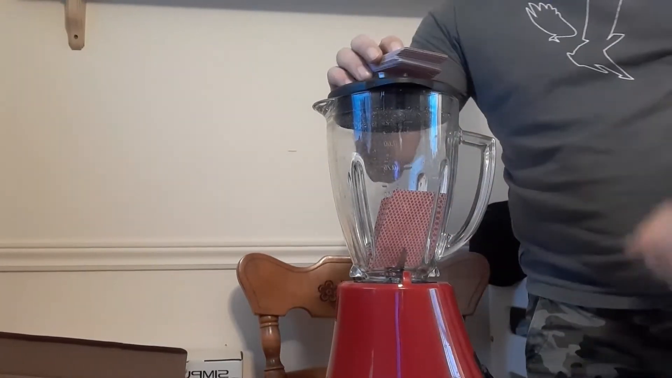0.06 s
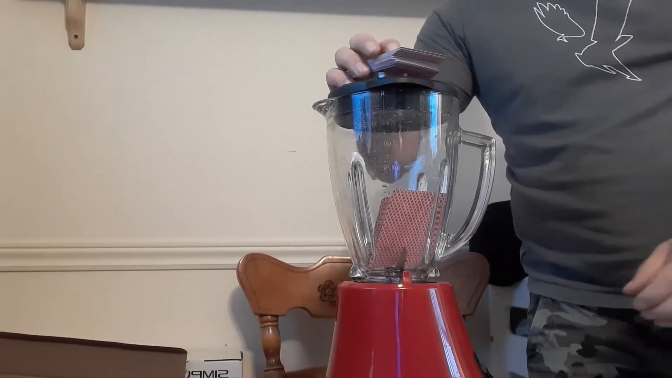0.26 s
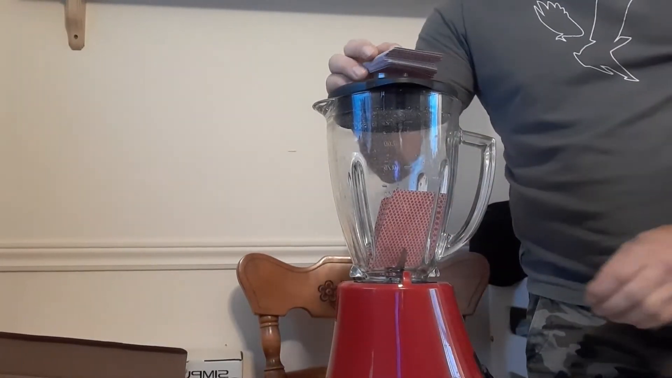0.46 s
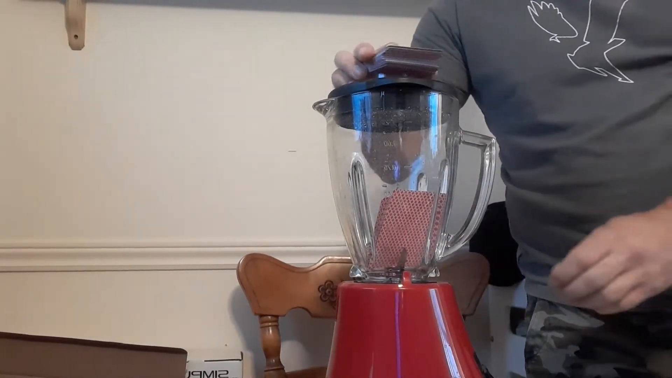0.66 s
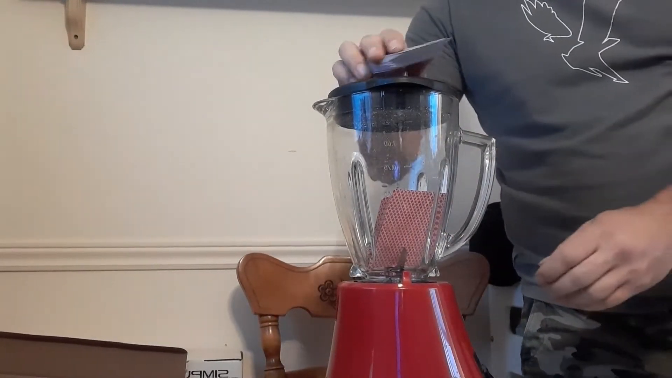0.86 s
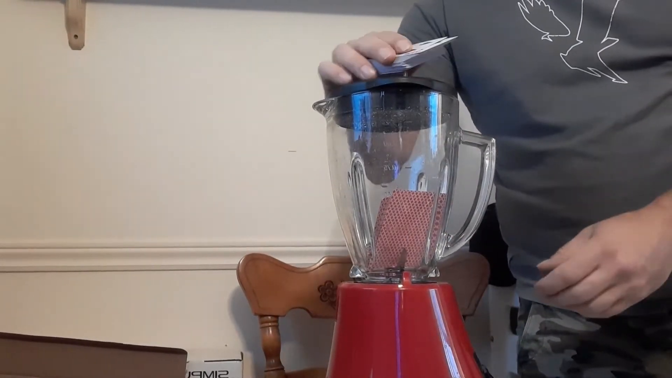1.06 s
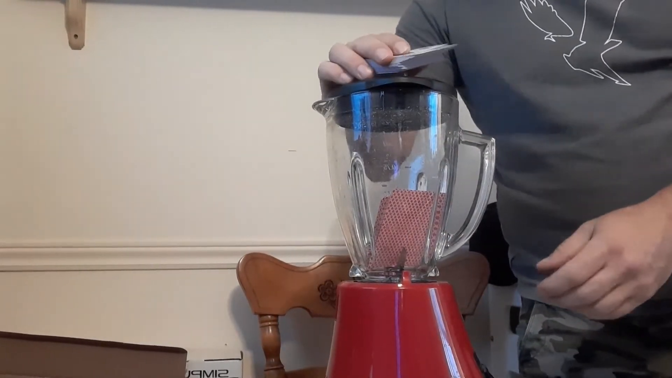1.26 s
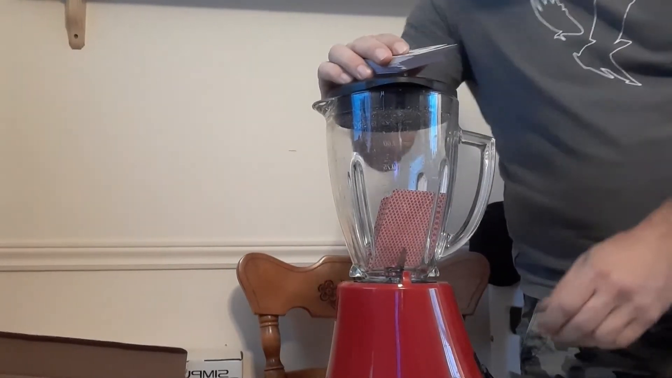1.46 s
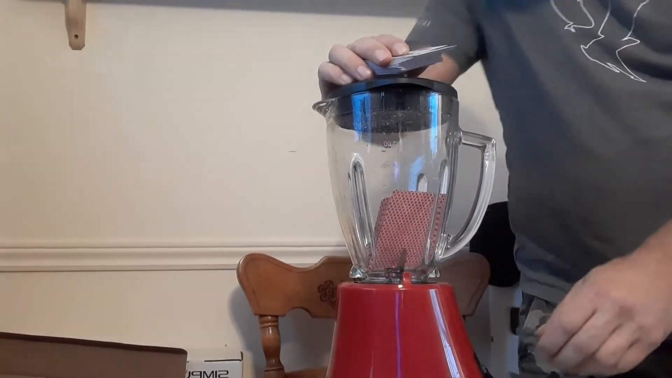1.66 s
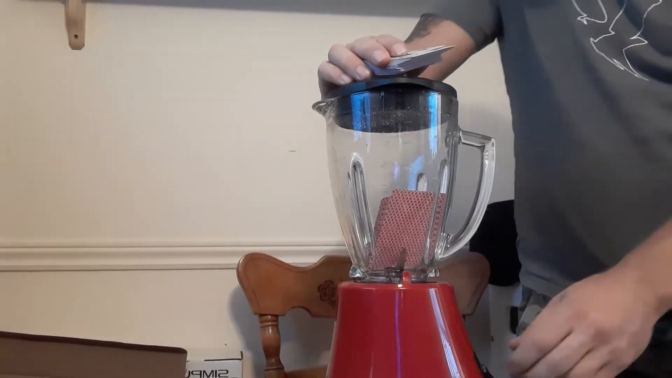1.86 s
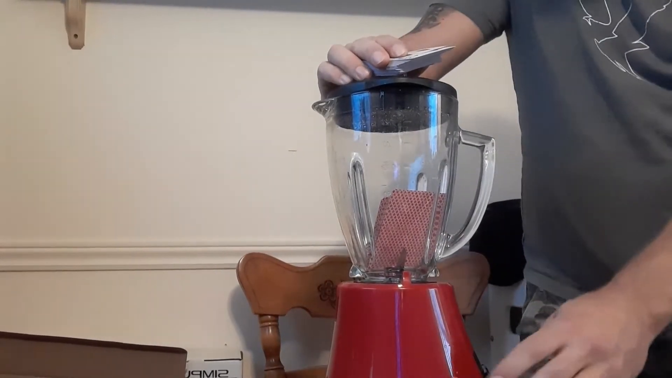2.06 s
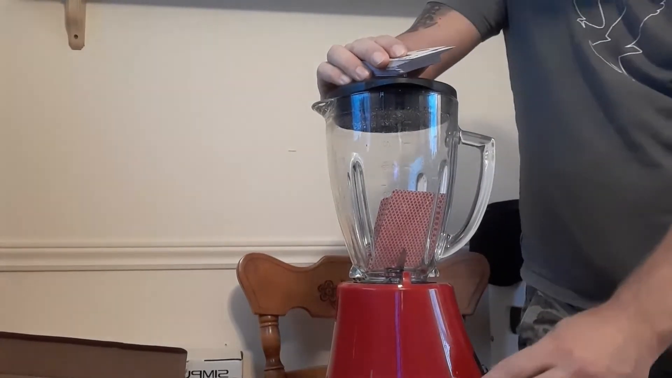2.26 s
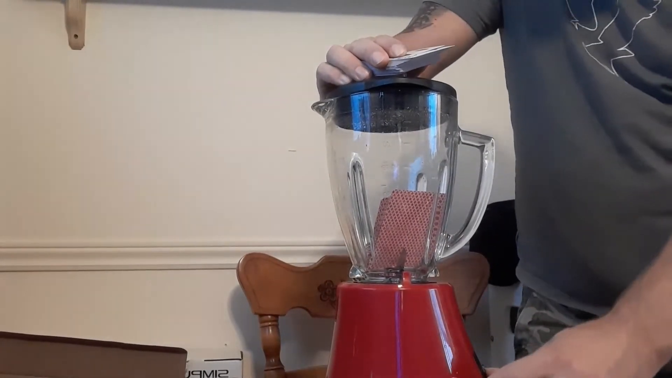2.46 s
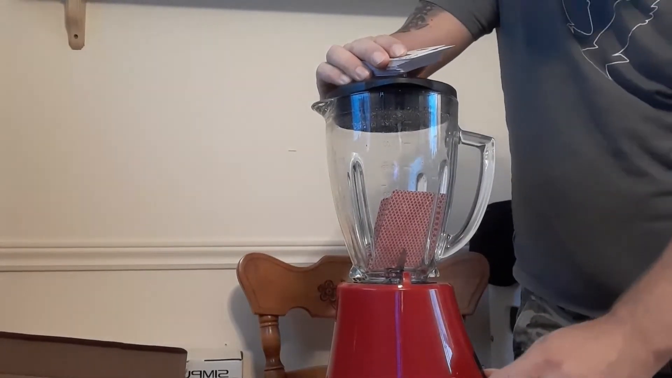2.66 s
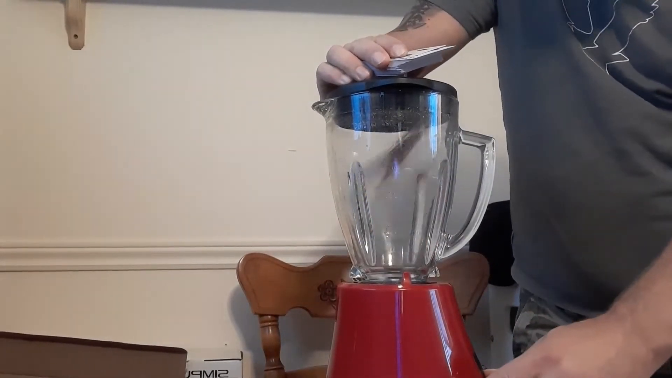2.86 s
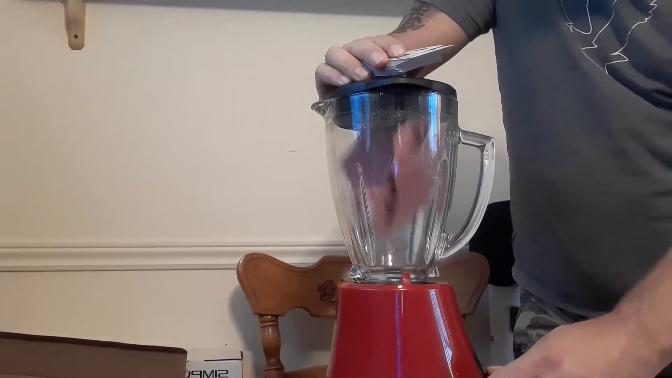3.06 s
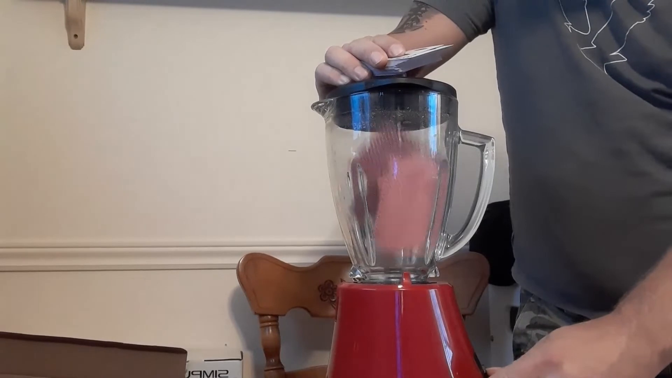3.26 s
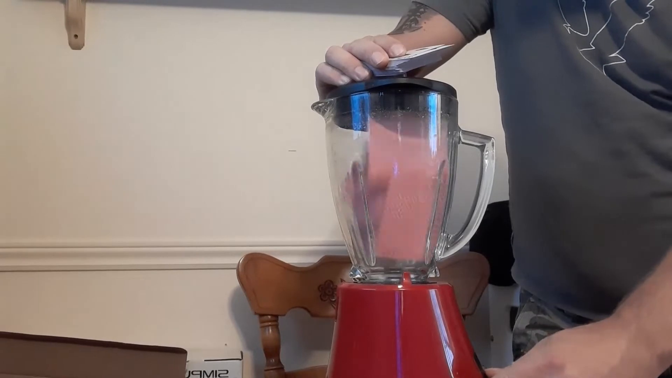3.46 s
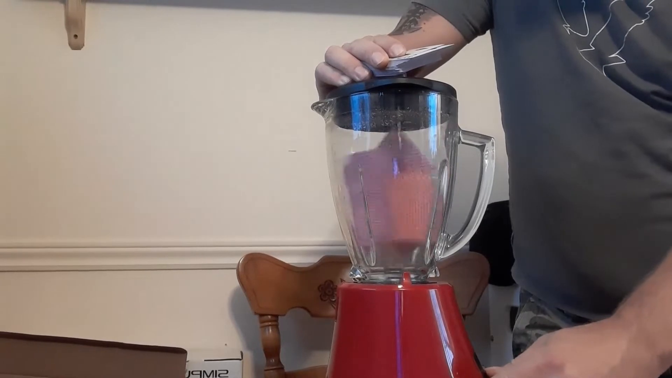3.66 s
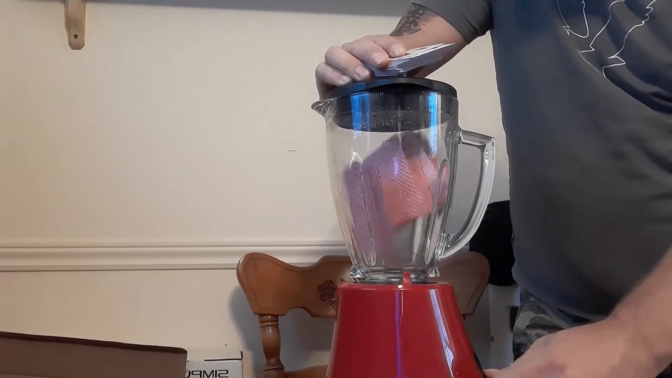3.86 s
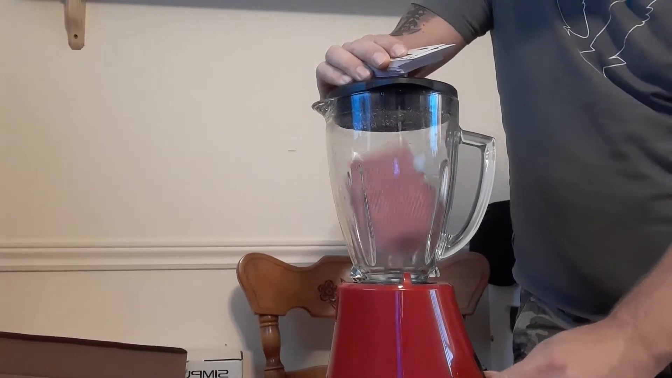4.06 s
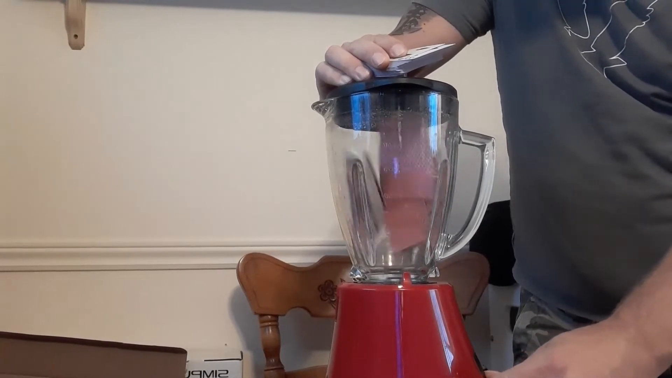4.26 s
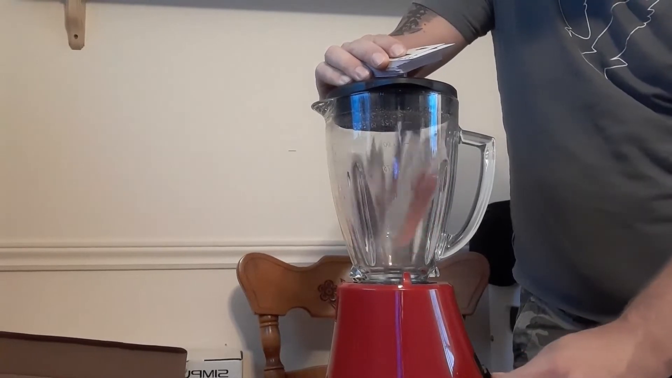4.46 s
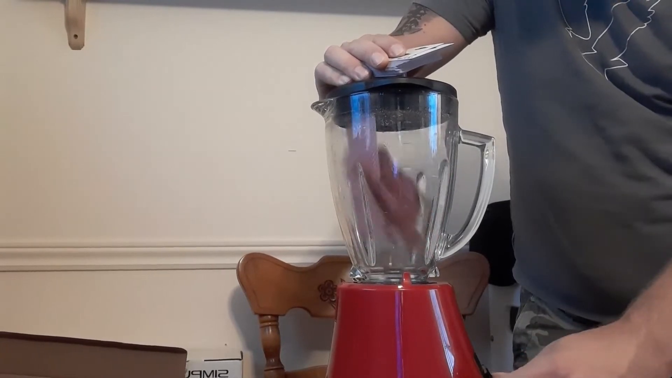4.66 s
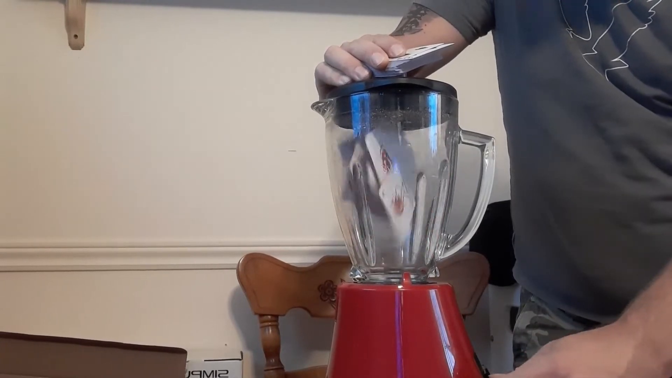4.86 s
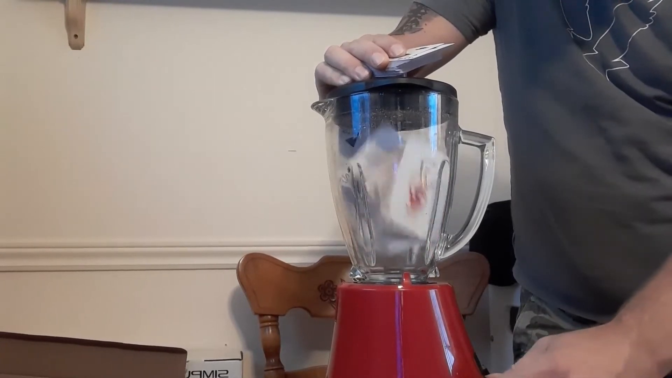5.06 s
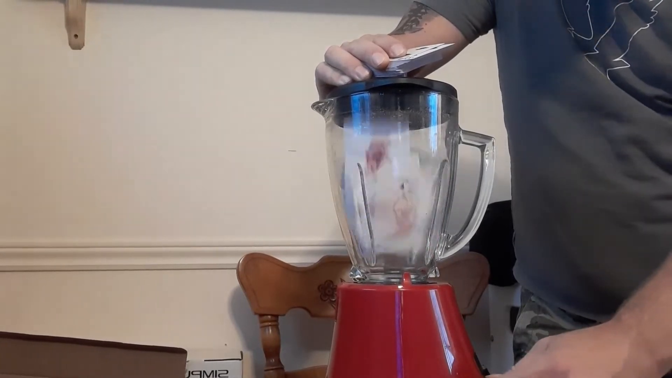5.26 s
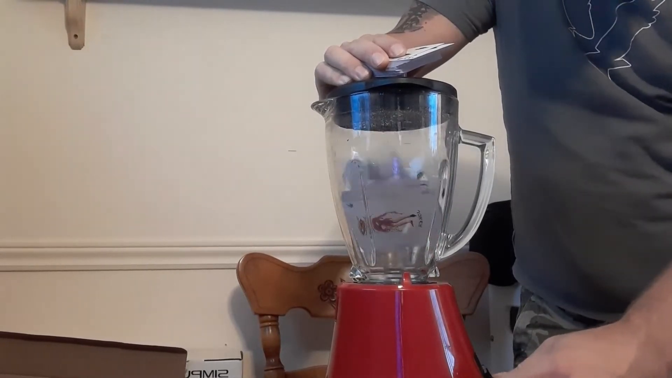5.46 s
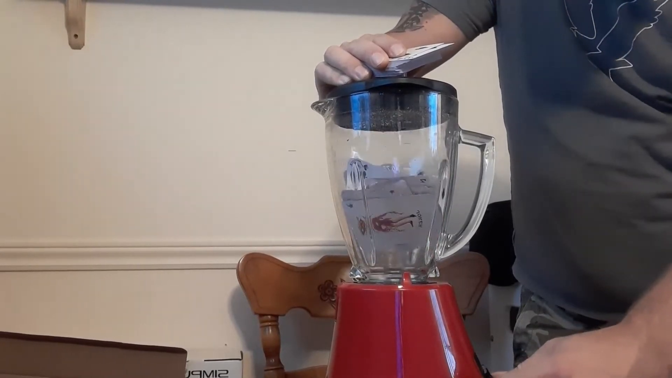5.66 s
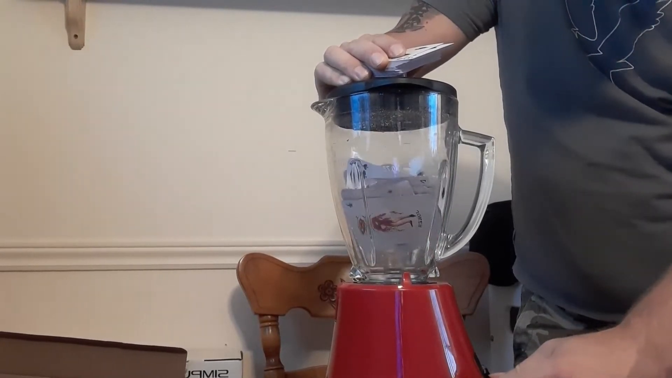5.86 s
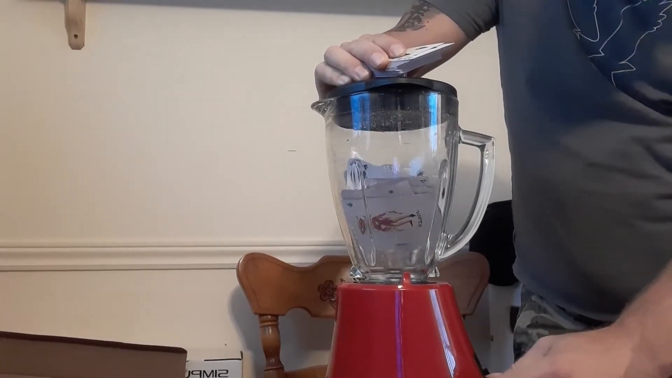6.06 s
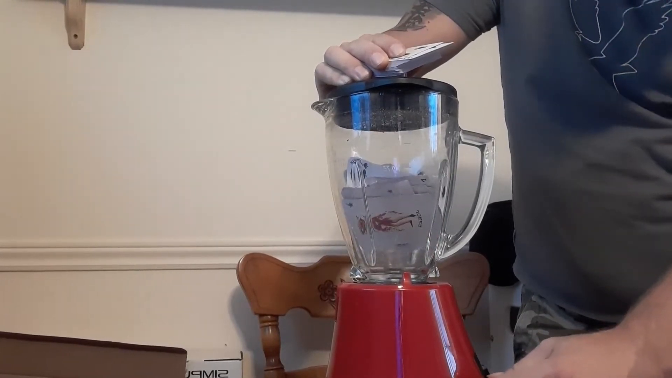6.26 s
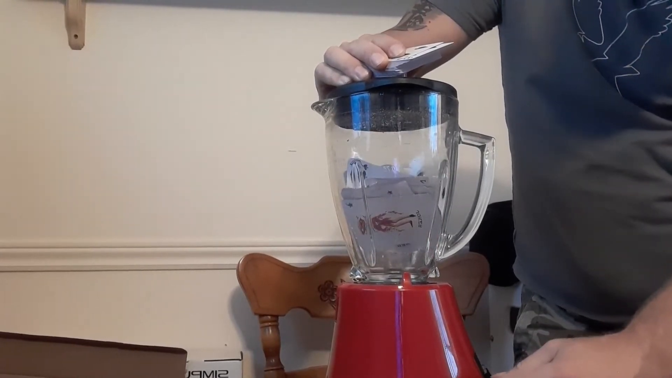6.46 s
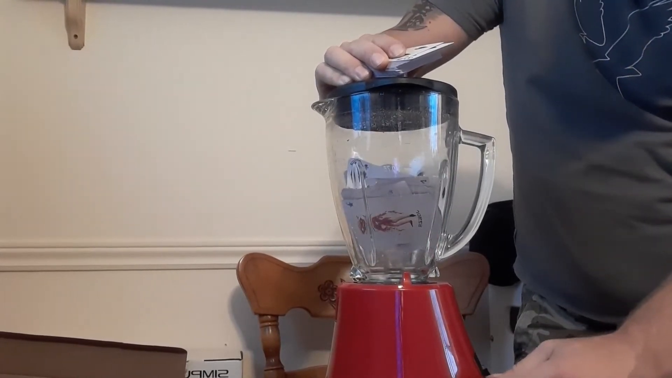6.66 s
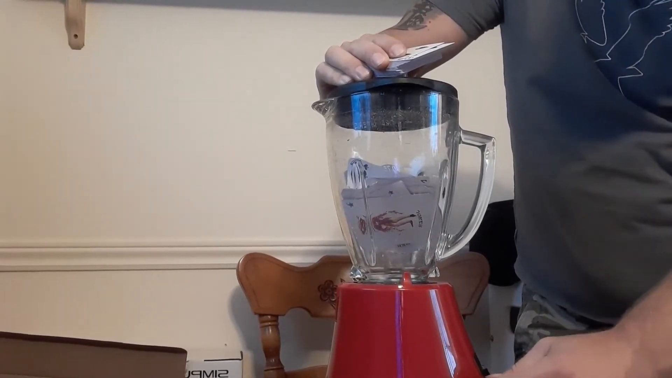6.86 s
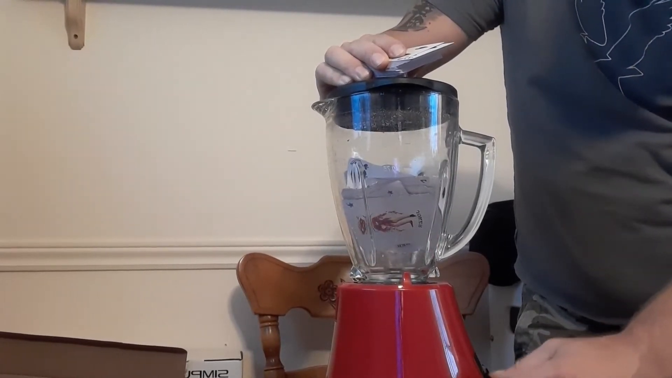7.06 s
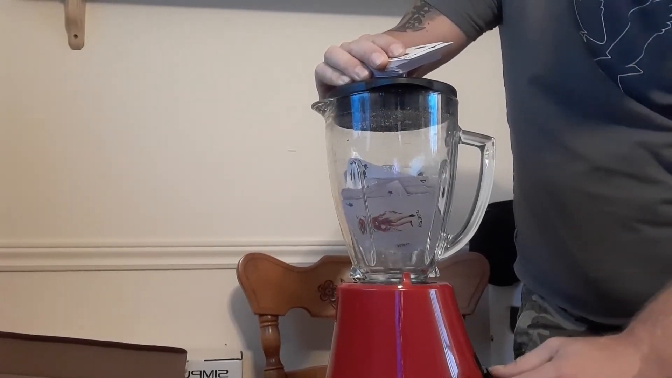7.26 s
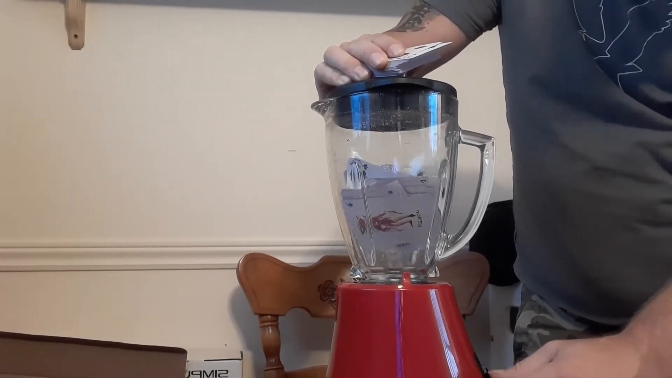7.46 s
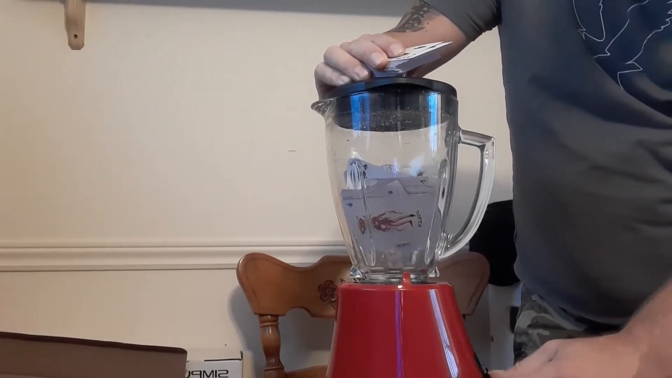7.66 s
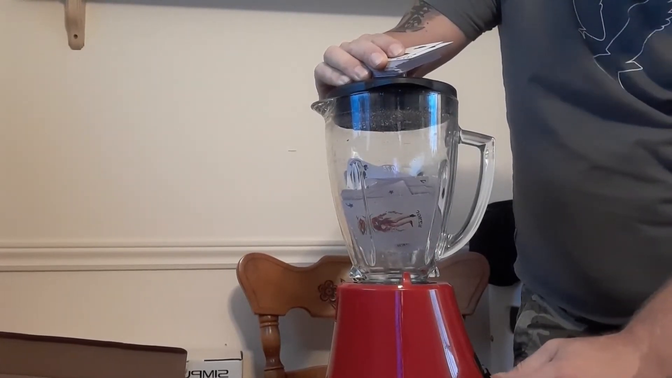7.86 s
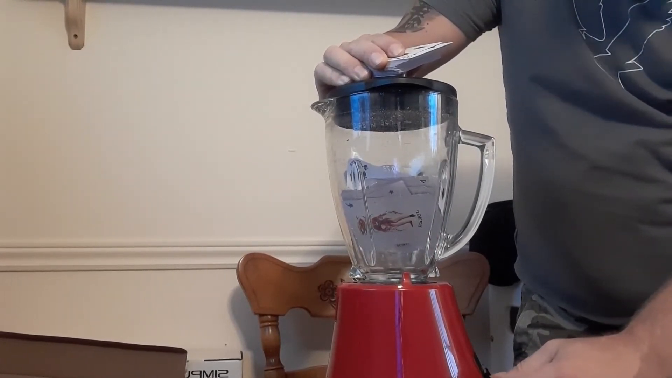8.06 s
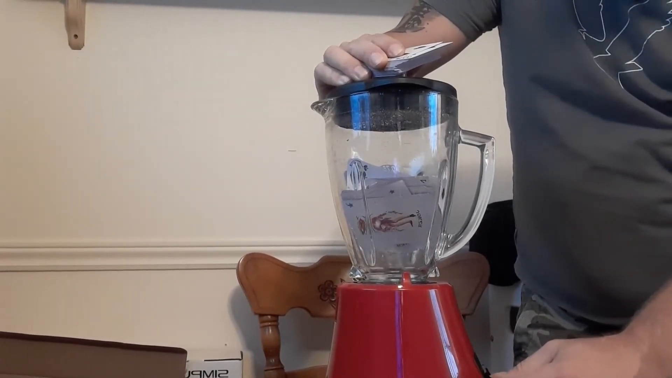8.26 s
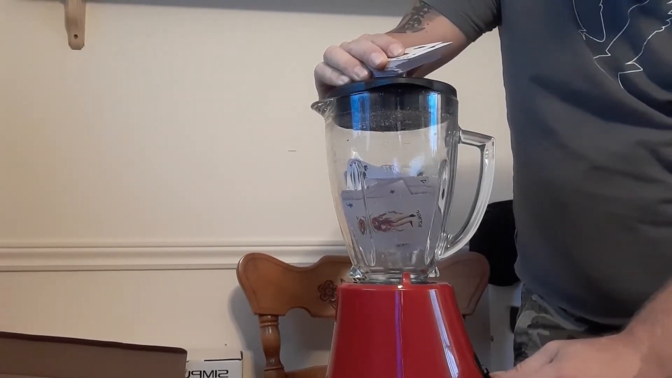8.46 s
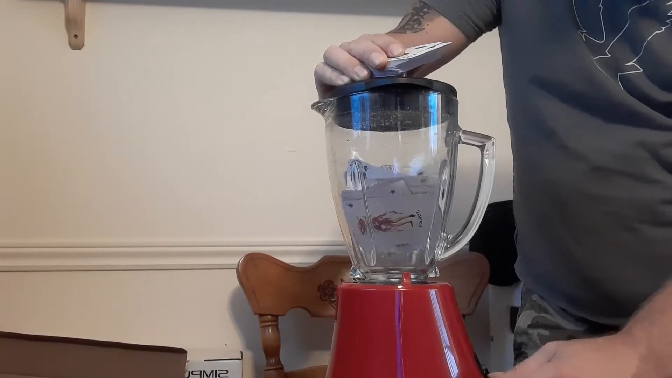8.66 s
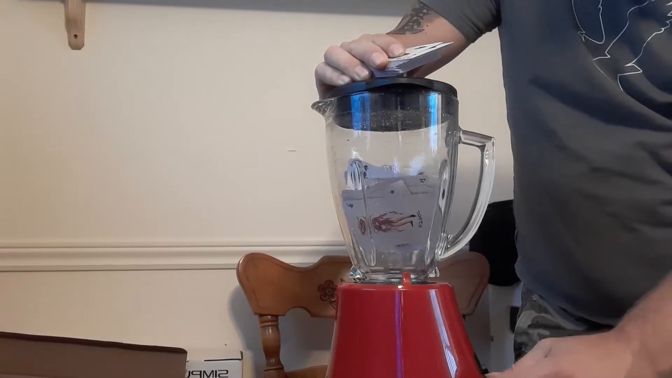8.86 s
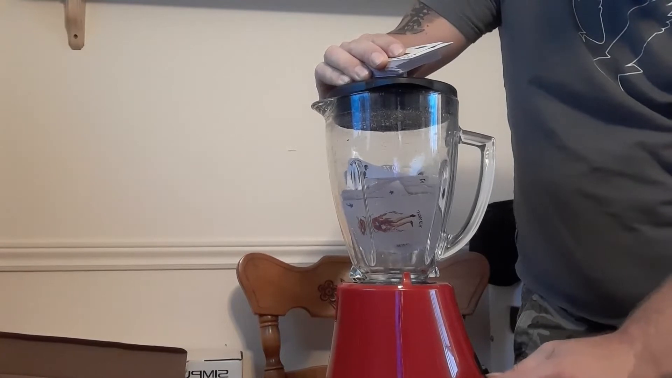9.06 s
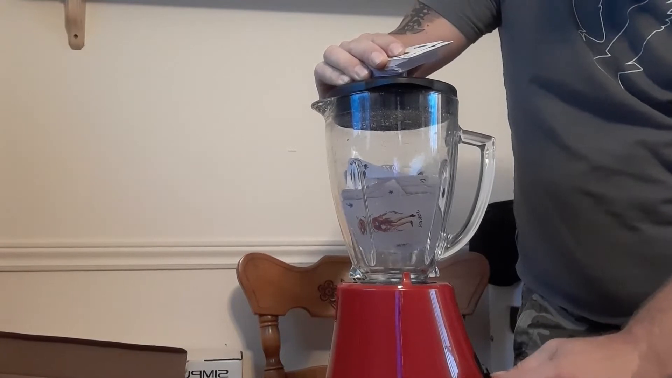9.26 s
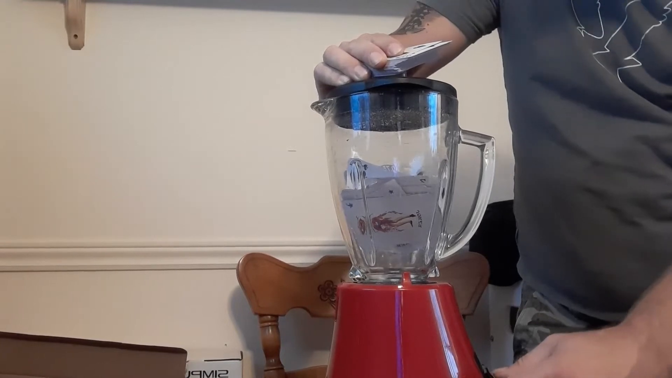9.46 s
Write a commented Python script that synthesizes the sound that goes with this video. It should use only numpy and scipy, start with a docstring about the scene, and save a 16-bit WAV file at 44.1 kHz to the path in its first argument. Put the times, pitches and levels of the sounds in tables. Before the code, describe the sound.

In a small room with a faint house hush, fingers tap and rub a plastic lid and cards tick lightly. Then a countertop blender is pulsed six times: the motor surges, drones and winds down, blades chop cards with hard cracks and glassy smacks. Later pulses are steadier, a buzzing drone with rushing flutter. Close microphone, stereo, short room echoes.

```python
"""A countertop blender with playing cards in its glass jar, in a small room with a faint house background.
First a hand settles on the lid: taps, rubs and ticks are short noise bursts, and the floor rumbles once.
Then six pulses spin the motor up against friction and air and let it coast: shaft orders drone through
the housing, four blades flick the cards in modulated noise, and caught cards are chopped and brake the rotor.
In the early pulses the loose cards also smack and boom; from about 5.3 s they lie wedged and the drone steadies."""
import sys
import numpy as np
from scipy import signal
from scipy.fft import rfft, irfft
from scipy.io import wavfile
from scipy.ndimage import uniform_filter1d

SR = 44100
rng = np.random.default_rng(int(sys.argv[2]) if len(sys.argv) > 2 else 0)


def transcribe(signal):
    """Save signal, clipped to [-1, 1], as a 16-bit WAV file at the path in sys.argv[1]."""
    frames = np.atleast_2d(signal).T
    limited = np.clip(frames, -1, 1)
    pcm = np.round(limited * 32767).astype(np.int16)
    wavfile.write(sys.argv[1], SR, pcm)


N = 418950
TIME = np.arange(N) / SR

# All levels are relative, ahead of the gains and filters in the functions.
# Background noise of the house: f/Hz, density/dB
FLOOR_SPECTRUM = [(25, -24), (80, 1.5), (120, 3.5), (175, -1.5), (300, 2), (600, -23.5), (2000, -18.5),
                  (3400, -27), (6800, -20), (10000, -29.5), (16000, -23)]
FLOOR_DB = -64.5

# Reverberation time of the room: f/Hz, t60/s
REVERBERATION = [(100, 0.79), (2000, 0.29), (15000, 0.31)]
# Echo level over direct sound: f/Hz, level/dB
ECHO_LEVEL = [(100, -5.5), (330, -8), (900, -1), (3000, 1), (8000, 3.5)]
# Left-right correlation of the echoes: f/Hz, correlation/1
ECHO_LIKENESS = [(100, 0.87), (300, 0.79), (600, 0.63), (1200, 0.01)]
# Left minus right: f/Hz, level/dB
STEREO_TILT = [(100, 3), (650, 1.6), (1290, 4), (8100, 0), (13000, 5.5)]

# The floor rumbles as the body shifts its weight: f/Hz, density/dB
BOARDS_SPECTRUM = [(30, -22), (75, 5), (125, 9), (220, -20), (3000, -70)]
SHIFT_S, SHIFT_HALF_S, SHIFT_DB = 2.02, 0.37, -57  # middle, half length, level

# Fingers and knuckles on lid and base: t/s, thud level/dB, click level/dB, decay/s
TAPS = [(0.204, -50, -54, 0.015), (0.217, -49.5, -56, 0.013), (1.668, -50, -46, 0.013),
        (1.762, -42, -41.5, 0.012), (1.782, -41, -57, 0.0096), (1.933, -50, -77, 0.028),
        (2.076, -48.5, -51, 0.017), (2.417, -47.5, -58, 0.025)]
# Spare cards in the hand tick on the plastic lid: t/s, level/dB, decay/s
LID_TICKS = [(.305, -56, 0.014), (.34, -44, .0035), (.35, -46, 0.0022), (.3805, -38, 0.0023),
             (.783, -55, .005), (1.917, -52, .005)]
# Hand and sleeve slide: middle t/s, half length/s, rumble level/dB, swish level/dB
RUBS = [(0.607, 0.075, -59.5, -82), (0.828, 0.098, -55.5, -71.5), (1.028, 0.05, -52.5, -70),
        (1.478, 0.076, -71, -67.5), (1.862, 0.19, -82, -68.5), (2.083, 0.033, -53, -56),
        (2.53, 0.02, -55, -68)]
# Spectrum of thuds, and of the rumble under the drone: f/Hz, density/dB
THUD_SPECTRUM = [(40, -24), (100, -17), (190, -8), (300, 0), (440, -7), (520, -15), (1500, -33),
                 (5000, -60)]
# Spectrum of the clicks of taps: f/Hz, density/dB
CLICK_SPECTRUM = [(200, -14), (700, 3), (1500, 3), (2700, -9), (3600, -15), (16000, -43)]
# Spectrum of cards on the lid: f/Hz, density/dB
LID_SPECTRUM = [(300, -19), (1300, -11), (2000, 2), (2600, -10), (3100, -17), (3650, -10), (4300, -22),
                (16000, -39)]
# Spectrum of the sliding sleeve: f/Hz, density/dB
SWISH_SPECTRUM = [(350, -27), (1470, -11), (2500, -6), (16000, -19.5)]
# Resonance of the appliance under the pressing hand: f/Hz, width/Hz, lift/dB
HAND_MODES = [(336.5, 19, 8.5)]

# The pulse button is held: on t/s, off t/s, starting pull/(Hz/s), cards level/dB, base level/dB
PULSES = [(2.72, 2.933, 874, 2, 1.5), (3.864, 4.287, 861, -.5, -2), (4.97, 5.399, 642, -1, -1.5),
          (6.032, 6.279, 754, -1.25, -2), (6.672, 7.046, 695, -0.5, -1), (8.717, 9.096, 850, 1, .5)]
# The blades catch a card: t/s, level/dB, decay/s, extra treble/dB
CATCHES = [(2.7684, -20.5, 0.016, -6), (2.869, -16, 0.0084, 1.5), (2.968, -15, 0.013, -6.5),
           (3.135, -18.5, 0.01, -2), (3.294, -20, 0.014, -3), (3.386, -25, 0.03, -2.5),
           (3.493, -27, 0.028, 1.5), (3.593, -26, 0.018, 1), (3.92, -26.5, 0.056, -5),
           (4.088, -20.5, 0.021, 0.5), (4.206, -23.5, 0.031, -0.5), (4.31, -21.5, 0.025, -3),
           (4.382, -22, 0.023, 0.5), (4.555, -17.5, 0.015, -5.5), (4.697, -27, 0.044, 0),
           (4.747, -17.5, 0.018, -6.5), (4.974, -22, 0.014, -2.5), (5.232, -19, 0.0091, -2.5),
           (5.284, -24, 0.014, 3), (5.817, -22, 0.0096, 1.5), (5.885, -24.5, 0.011, 7)]
CRUISE_HZ = 150  # reference shaft speed
PULL_FADE_HZ = 282  # speed over which the pull falls by a factor e
FRICTION_HZ_PER_S, AIR_HZ_PER_S = 88.6, 58.7  # braking; that of the air holds at cruising speed
BITE_HZ_PER_S = 1460  # braking by a caught card at 0 dB

# Level of the base while coasting, and its lift under power
BASE_DB, BASE_POWERED_DB = -31.5, 1.5
BASE_STANDSTILL = 0.88  # share of the shaking that a powered motor has before it turns
# Level of the cards at cruising speed, gain per doubling of speed, and lift under power
CARDS_DB, CARDS_DB_PER_OCTAVE, CARDS_POWERED_DB = -20, 5.5, 2.26
CARDS_STALL_HZ, BASE_STALL_HZ = 14.2, 25.6  # below these speeds cards and base fall quiet
# Cards press onto the blades (+) or are tossed clear (-): middle t/s, half length/s, level/dB
PACK_SHIFTS = [(3.723, 0.083, 6), (4.649, 0.042, -2), (4.876, 0.028, -4.5), (5.046, 0.06, -4),
               (7.09, 0.067, 2)]

# Shaft orders: multiple of speed/1, fast level/dB, slow level/dB, crawling level/dB, change under power/dB
ORDERS = [(1, -1, -5.5, -15, 0), (2, -1, -12, -12, 2), (3, -2.5, -16, -15, -4), (4, -9, 3, -4, -4),
          (5, 8.5, -8, -9, -9), (6, 8.5, -19, -7, -12), (8, -14, -14, 1, -4)]
WEDGED_S = 5.32  # by now the cards have stopped flying about
LOOSE_DB_PER_ORDER = -0.67  # while they fly, the high orders are weaker
WHINE_FADE_DB_PER_HZ = 0.1  # orders above 4 fade beyond cruising speed
# Spectrum of the base: f/Hz, density/dB
HOUSING_SPECTRUM = [(25, -63), (55, -17), (80, -14), (110, 3), (145, -5), (200, -5.5), (260, 1), (320, 3.5),
                    (400, -1.5), (560, -14), (950, -18.5), (2500, -14.5)]
# Resonances of the base on its table: f/Hz, width/Hz, lift/dB
BASE_MODES = [(126, 18, 5), (249, 14, 6), (365, 20, 3), (440, 24, 4), (710, 170, 6)]

# The switch closes and the coupling jerks: t/s, level/dB, decay/s
JERKS = [(2.72, -24, 0.5), (3.864, -8, 0.0035), (8.72, -22, 0.016)]
# The tumbling pack jolts the rotor and the base booms: t/s, level/dB, decay/s
BOOMS = [(2.745, -22, 0.085), (3.405, -17, 0.051), (3.52, -24, 0.05), (3.635, -23.5, 0.1)]
# Spectrum of the booms: f/Hz, density/dB
BOOM_SPECTRUM = [(60, -24), (190, -15), (250, 9.5), (285, 4), (370, -13), (900, -43), (5000, -66)]

# Resonances of the jar and the air in it: f/Hz, width/Hz, lift/dB
JAR_MODES = [(895, 140, 5), (1094, 92, 6.5), (1263, 184, 7.5), (1953, 53, 5.5), (2023, 23, 2.5),
             (2420, 38, 4.5), (2611, 118, 8), (3094, 87, 4.5), (3560, 34, 3), (4640, 130, 2.5)]
# Spectrum of the jar at speed: f/Hz, density/dB
RUSH_SPECTRUM = [(30, -58), (75, -6), (240, -18), (400, 1), (740, -14), (1230, -5.5), (1530, -10),
                 (1900, -1.5), (2180, -5), (2630, -1.5), (3640, 0.5), (5350, -8.5), (7870, -5), (9320, -17),
                 (12900, -12), (16000, -15)]
# Spectrum of the slow flicks: f/Hz, density/dB
FLICK_SPECTRUM = [(30, -41), (75, -22), (240, -13.5), (400, -3), (740, -14.5), (1220, -7), (1560, -12.5),
                  (2590, -7.5), (3870, 1), (5430, -16.5), (7870, -3.5), (8760, -18.5), (16000, -22.5)]
# Spectrum of the chops: f/Hz, density/dB
CHOP_SPECTRUM = [(30, -30), (100, -20.5), (300, -0.5), (650, -7), (1000, -8), (3700, 2), (5500, -7.5),
                 (8000, -4), (9500, -15.5), (15800, -9)]
# A card smacks the glass or a blade: t/s, level/dB, decay/s, f/Hz
SMACKS = [(2.781, -8, 0.007, 1800), (2.872, -3.5, 0.0035, 2900), (2.969, -8, 0.0023, 960),
          (3.122, -14.5, 0.0034, 1280), (3.139, -16, 0.0029, 2794), (3.296, -8, 0.0025, 1240),
          (3.602, -15, .002, 3150), (3.759, -17, 0.0059, 3140), (3.78, -22, .014, 2797),
          (4.034, -11.5, .003, 1287), (4.388, -13, 0.0019, 1260), (4.527, -12.5, .012, 4010),
          (4.568, -8.5, 0.0029, 1286), (4.753, -10.5, .003, 2410), (4.774, -6, 0.0036, 2192),
          (5.085, -16.5, 0.018, 3506), (5.235, -8, 0.0028, 940), (5.282, -14, 0.0063, 3570),
          (8.583, -34, 0.0041, 2964), (8.655, -37, 0.0098, 2996)]
EVEN_HZ = 90  # below this speed the blade passes grow alike
CRACKLE_DB, CRACKLE_HZ = 5, 696  # the card gives way in uneven snaps: their spread and rate
TEAR_HZ = 4150  # above this a caught card tears rather than slaps

EDGE_HZ = 15900  # upper band limit


def amp(db):
    """Amplitude ratio: 20 dB are a factor of ten."""
    return 10 ** (np.asarray(db) / 20)


def unit(x):
    """Normalization: scales a signal to rms 1."""
    return x / np.sqrt(np.mean(x ** 2) + 1e-20)


def read(points, hz):
    """Interpolation along a logarithmic frequency axis."""
    f, value = np.transpose(points)
    return np.interp(np.log(hz + 1), np.log(f + 1), value)


def noise():
    """White noise: equal mean power at all frequencies, rms 1."""
    return rng.standard_normal(N)


def drift(hz, size=26208):
    """Low-passed random fluctuation of rms 1, with content up to about hz."""
    duration = N / SR
    f = np.fft.rfftfreq(size, duration / size)
    spectrum = rfft(rng.standard_normal(size)) * np.exp(-(f / hz) ** 2)
    slow = unit(irfft(spectrum, size))
    return np.interp(TIME, np.linspace(0, duration, size), slow)


def colour(x, spectrum, modes=(), size=8192):
    """Minimum-phase filtering: a broad spectrum with resonances, of impulse-response energy 1."""
    hz = abs(np.fft.fftfreq(size, 1 / SR))
    db = np.maximum(read(spectrum, hz), -90)
    db = db + sum(lift / (1 + (2 * (hz - f) / width) ** 2) for f, width, lift in modes)
    # the phase follows from the log magnitude by the Hilbert transform
    response = np.exp(np.conj(signal.hilbert(np.log(amp(db)))))
    taps = np.fft.ifft(response).real[:size // 2]
    return signal.oaconvolve(x, taps / np.linalg.norm(taps))[:N]


def bursts(rows, rise=0.00033):
    """Impact envelopes (t/s, level/dB, decay/s): fast rise, exponential decay, powers added."""
    power = np.zeros(N)
    for s, db, length in rows:
        part = power[int(s * SR):][:SR // 3]
        t = TIME[:len(part)]
        part += (amp(db) * (1 - np.exp(-t / rise)) * np.exp(-t / length)) ** 2
    return np.sqrt(power)


def swell(middle, half):
    """Gaussian envelope: a smooth rise and fall around its middle."""
    return np.exp(-((TIME - middle) / half) ** 2)


def house():
    """Ambient noise: steady random sound of the house with a fixed spectrum."""
    return amp(FLOOR_DB) * colour(noise(), FLOOR_SPECTRUM)


def echoes(size=22050, count=12):
    """Reverberation: sparse random echoes with frequency-dependent decay, as left and right spectra."""
    taps = np.zeros((2, size))
    at = np.arange(SR // 400, size - count, count)
    at = at + rng.integers(0, count, (2, len(at)))
    np.put_along_axis(taps, at, rng.choice([-1., 1.], at.shape), 1)
    hz, t, z = signal.stft(taps, SR, nperseg=512)
    z = z * 1000. ** (-t / read(REVERBERATION, hz)[:, None])  # 60 dB down after t60
    tail = signal.istft(z, SR)[1][:, :size]
    tail = rfft(tail / np.linalg.norm(tail[0]), axis=1)
    same = np.clip(read(ECHO_LIKENESS, np.fft.rfftfreq(size, 1 / SR)), -1, 1)
    right = same * tail[0] + np.sqrt(1 - same ** 2) * tail[1]
    return np.array([tail[0], right])


def tumbling(count=7):
    """Moving source: blades whirl round the jar, so sound takes shifting paths of constant total power."""
    weights = np.array([drift(20.8) for _ in range(count)])
    return weights / np.linalg.norm(weights, axis=0)


def room(x, paths, size=22050):
    """Superposition: direct sound, one sample earlier at left, plus a set of echoes for each path's weight."""
    hz, lead = np.fft.rfftfreq(size, 1 / SR), SR // 100
    wet = amp(read(ECHO_LEVEL, hz))
    ports = amp(np.outer([.5, -.5], read(STEREO_TILT, hz))) / np.sqrt(1 + wet ** 2)
    direct = np.array([np.ones(len(hz)), np.exp(-2j * np.pi * hz / SR)])
    out = np.zeros((2, N))
    for weight, spectrum in [(0.96, direct)] + [(path, wet * echoes()) for path in paths]:
        # the lead keeps what precedes time zero, and is cut off again
        response = np.roll(irfft(ports * spectrum, size, axis=1), lead, 1)
        out += signal.oaconvolve((weight * x)[None], response, axes=1)[:, lead:lead + N]
    return out


def floorboards():
    """Structure-borne sound: the floor rumbles in one slow swell as the body shifts its weight."""
    return colour(noise() * amp(SHIFT_DB) * swell(SHIFT_S, SHIFT_HALF_S), BOARDS_SPECTRUM)


def taps_and_rubs():
    """Impact and friction: a tap is a dull thud with a click, a rub a soft rumble with a swish."""
    thuds = bursts([(s, db, length) for s, db, _, length in TAPS], rise=0.0034)
    clicks = bursts([(s, db, length) for s, _, db, length in TAPS], rise=0.00055)
    rumble = sum(amp(db) * swell(s, half) for s, half, db, _ in RUBS)
    swish = sum(amp(db) * swell(s, half) for s, half, _, db in RUBS)
    low = colour(noise() * (amp(8.5) * thuds + rumble), THUD_SPECTRUM, HAND_MODES)
    click_sound = colour(noise() * clicks, CLICK_SPECTRUM)
    swish_sound = colour(noise() * swish * amp(4.8 * drift(150)), SWISH_SPECTRUM)
    return low + click_sound + swish_sound


def lid_ticks():
    """Light impact: spare cards tick on the plastic lid in very short bursts."""
    return colour(noise() * bursts(LID_TICKS, rise=0.0002), LID_SPECTRUM)


def motor(size=64):
    """Balance of torques: pull fades with shaft speed (turns/s); friction, air and caught cards brake."""
    t = TIME[::size]
    pull = sum(force * np.clip(np.minimum(t - on, off - t) * SR / size, 0, 1)
               for on, off, force, _, _ in PULSES)
    bites = bursts([row[:3] for row in CATCHES])[::size]
    hz, speeds = 0, []
    for force, bite in zip(pull, bites):
        drive = force * np.exp(-hz / PULL_FADE_HZ)
        drag = BITE_HZ_PER_S * bite + FRICTION_HZ_PER_S + AIR_HZ_PER_S * (hz / CRUISE_HZ) ** 2
        hz = max(hz + (drive - drag) * size / SR, 1)
        speeds.append(hz)
    return uniform_filter1d(np.interp(TIME, t, speeds), size=1500)


def levels(speed, powered):
    """Excitation grows with speed and power; each pulse throws the cards into a new lie."""
    on, _, _, cards_db, base_db = np.transpose(PULSES)
    pulse = np.maximum(np.searchsorted(on, TIME) - 1, 0)
    shake = amp(BASE_DB + base_db[pulse] + BASE_POWERED_DB * powered)
    shake = shake * np.maximum(BASE_STANDSTILL * powered, np.tanh((speed / BASE_STALL_HZ) ** 2))
    shift_db = sum(db * swell(s, half) for s, half, db in PACK_SHIFTS)
    speed_db = CARDS_DB_PER_OCTAVE * np.log2(speed / CRUISE_HZ)
    load = amp(CARDS_DB + cards_db[pulse] + CARDS_POWERED_DB * powered + speed_db + shift_db)
    return shake, load * np.tanh((speed / CARDS_STALL_HZ) ** 2)


def drone(turns, speed, powered):
    """Forced vibration: shaft orders, rumble and mains buzz, all heard through the resonant housing."""
    # at speed the unbalanced shaft leads; when it slows, the blades knocking on the cards take over
    fast = np.clip((speed - 95) / 45, 0, 1)
    crawl = np.clip((62 - speed) / 18, 0, 1)
    slow = 1 - fast - crawl
    # loose cards jolt the rotor and blur its tones until they wedge in the jar
    loose = np.clip((WEDGED_S - TIME) / .2, 0, 1)
    overspeed = np.maximum(speed - CRUISE_HZ, 0)
    lines = np.zeros(N)
    for k, fast_db, slow_db, crawl_db, power_db in ORDERS:
        db = fast * fast_db + crawl * crawl_db + slow * slow_db + powered * power_db
        # the rocking base roughens the lowest orders most
        db = db + (2.3 if k < 4 else .6) * drift(28)
        db = db + LOOSE_DB_PER_ORDER * k * loose - WHINE_FADE_DB_PER_HZ * overspeed * (k > 4)
        jolts = (.08 + .65 * loose * np.minimum(k * speed / 600, 2)) * drift(45)
        lines += amp(db) * np.sin(2 * np.pi * (k * turns + rng.random()) + jolts)
    lines *= np.minimum(speed / 35, 1)
    # the current, and with it the buzz, is largest while the rotor is still slow
    mains = 2 * np.pi * 120 * TIME
    harmonics = .5 * np.sin(mains) + 1.2 * np.sin(2 * mains) + .4 * np.sin(3 * mains)
    buzz = powered * np.exp(-speed / 70) * harmonics
    rumble = colour(noise(), THUD_SPECTRUM) * amp(-13 + 4 * fast + 5 * powered + 3 * loose)
    vibration = (lines + buzz + rumble) * (TIME > PULSES[0][0])
    return unit(colour(vibration, HOUSING_SPECTRUM, BASE_MODES))


def jerks():
    """Transient excitation: the closing switch and jerking coupling knock on the jar."""
    return colour(noise() * bursts(JERKS, rise=0.0025), RUSH_SPECTRUM, JAR_MODES)


def booms():
    """Impulse response: the base booms when the tumbling pack jolts the rotor."""
    return colour(noise() * bursts(BOOMS, rise=0.0033), BOOM_SPECTRUM)


def smacks():
    """Resonance: each smack is a short knock around its own pitch, ringing the jar."""
    out = np.zeros(N)
    for s, db, length, hz in SMACKS:
        spectrum = [(hz / 3, -20), (hz / 1.2, 0), (hz * 1.2, 0), (hz * 8, -45)]
        out += colour(noise() * bursts([(s, db, length)], rise=0.00066), spectrum, JAR_MODES)
    return out


def strikes(turns, speed, ring, scatter_db, count=4):
    """Periodic impact: each blade pass has its own force and decays with time constant ring/s."""
    passes = turns * count
    index = passes.astype(int)
    # a slow rotor only strokes the cards, evenly
    chance = np.clip(rng.standard_normal(N), -2, 2)
    force = amp(scatter_db * np.tanh(speed / EVEN_HZ) * chance)[index]
    shape = force * np.exp(-(passes - index) / (count * speed) / ring)
    return shape / np.sqrt(abs(uniform_filter1d(shape ** 2, size=4000)) + 1e-9)


def chops(turns, speed):
    """Fracture noise: a caught card takes a quick run of blade strikes, a slap with a tearing hiss above."""
    crackle = unit(amp(CRACKLE_DB * drift(CRACKLE_HZ)))
    blows = colour(noise() * crackle, CHOP_SPECTRUM, JAR_MODES)
    slap = signal.sosfiltfilt(signal.butter(2, TEAR_HZ, fs=SR, output="sos"), blows)
    slaps = bursts([(s, db, length) for s, db, length, _ in CATCHES], rise=0.0041)
    tears = bursts([(s, db + treble_db, length) for s, db, length, treble_db in CATCHES], rise=0.0032)
    run = amp(11.0) * (0.98 * strikes(turns, speed, ring=0.0032, scatter_db=-1) + 0.2)
    return run * (slap * slaps + (blows - slap) * tears)


def cards(turns, speed, powered):
    """Amplitude modulation: flicks at low speed thicken into a rush of air and fluttering card."""
    share = np.maximum(np.clip((speed - 45) / 130, .15, .85), 0.24 * powered)
    # between flicks the blades keep scraping along the cards
    flicks = noise() * (0.7 * strikes(turns, speed, ring=0.0021, scatter_db=4.0) + 0.21)
    rush = noise() * unit(amp(3.3 * drift(360) + 0.52 * drift(41)))
    flicking = np.sqrt(1 - share) * colour(flicks, FLICK_SPECTRUM, JAR_MODES)
    return flicking + np.sqrt(share) * colour(rush, RUSH_SPECTRUM, JAR_MODES)


def blender():
    """Common excitation: one shaft speed drives the drone of the base and the blades in the jar."""
    speed = motor()
    turns = np.cumsum(speed) / SR
    held = sum(1. * ((TIME > on) & (TIME < off)) for on, off, *_ in PULSES)
    powered = uniform_filter1d(held, size=300)
    started = np.clip((TIME - PULSES[0][0]) / 0.016, 0, 1)
    shake, load = levels(speed, powered)
    base = started * shake * drone(turns, speed, powered) + jerks() + booms()
    jar = started * load * cards(turns, speed, powered) + chops(turns, speed) + smacks()
    return base, jar


def scene():
    """Superposition of house, hand, base and jar in one room; only the jar's paths shift."""
    handling = floorboards() + taps_and_rubs() + lid_ticks()
    base, jar = blender()
    still = house() + handling + base
    return room(still, [1]) + room(jar, tumbling())


def record(dry):
    """Transduction: the microphone sheds the deepest bass and clips the highest peaks; a band limit follows."""
    thin = signal.sosfilt(signal.butter(2, 50, "high", fs=SR, output="sos"), dry)
    clipped = np.clip(thin, -.9, .9)
    low_pass = signal.firwin(511, EDGE_HZ, window=("kaiser", 8), fs=SR)
    return signal.oaconvolve(clipped, low_pass[None], "same")


dry = scene()
out = record(dry)
transcribe(out)
```